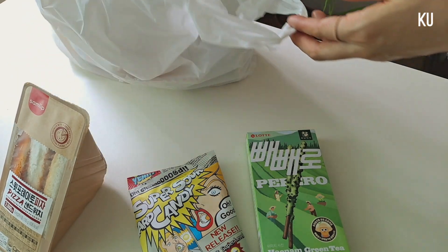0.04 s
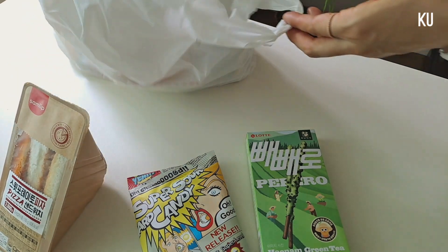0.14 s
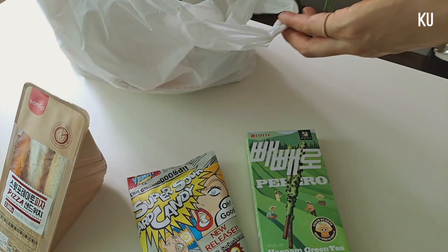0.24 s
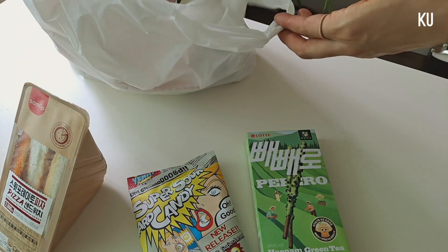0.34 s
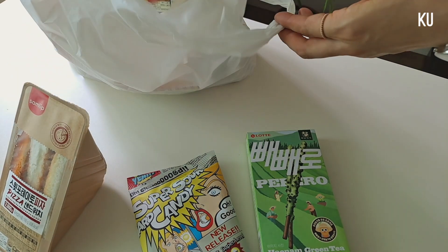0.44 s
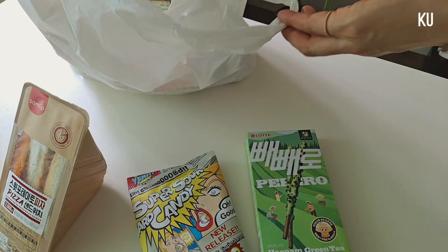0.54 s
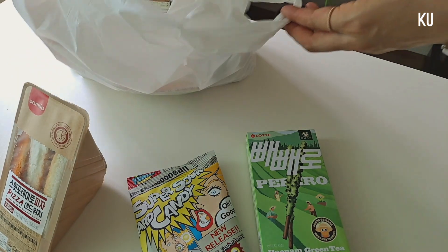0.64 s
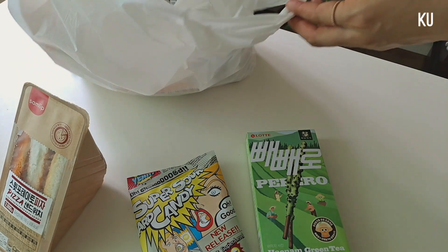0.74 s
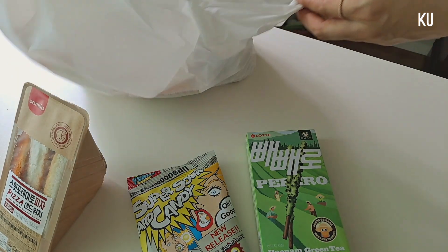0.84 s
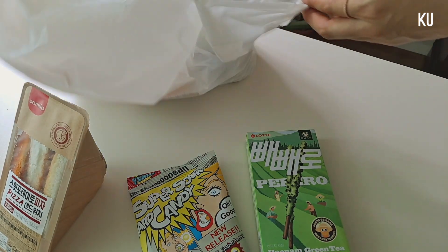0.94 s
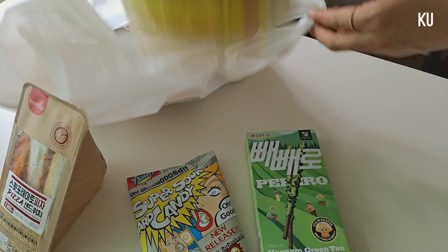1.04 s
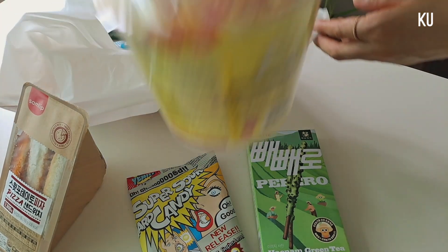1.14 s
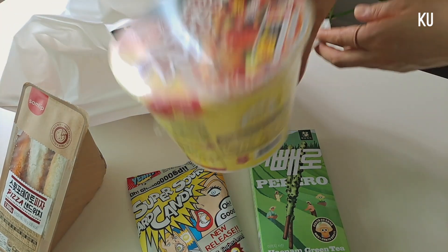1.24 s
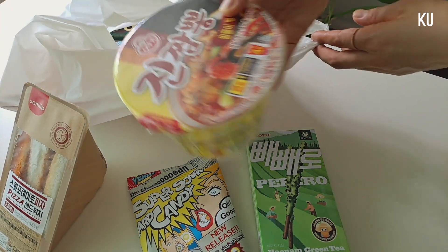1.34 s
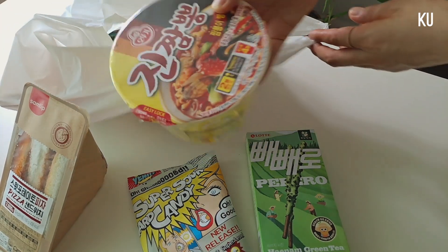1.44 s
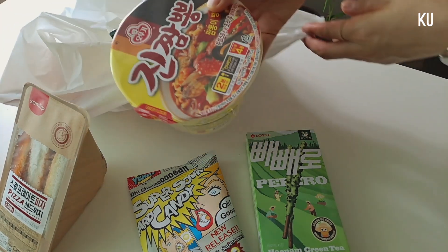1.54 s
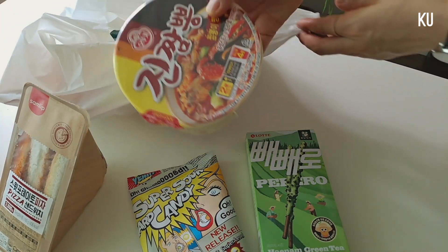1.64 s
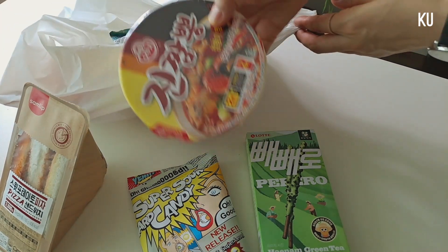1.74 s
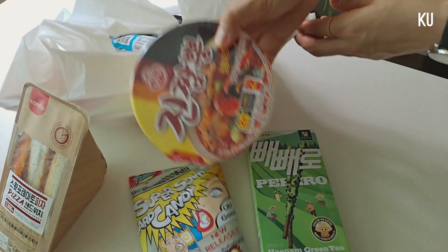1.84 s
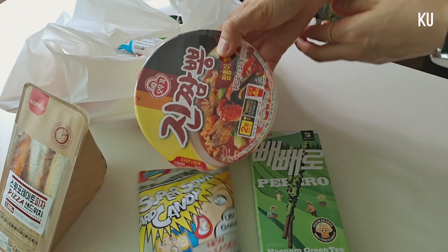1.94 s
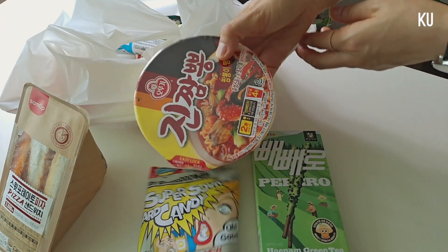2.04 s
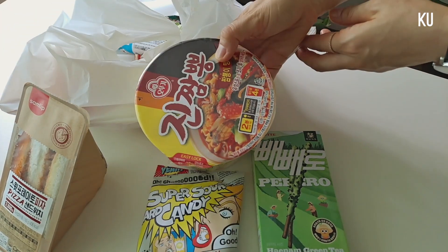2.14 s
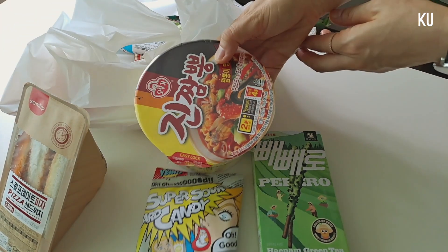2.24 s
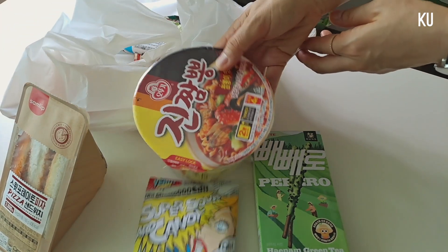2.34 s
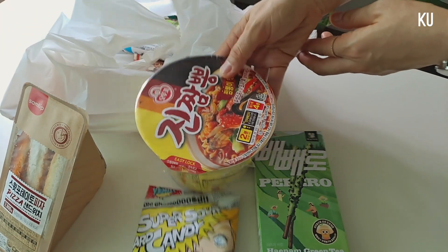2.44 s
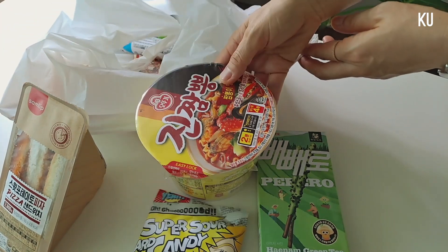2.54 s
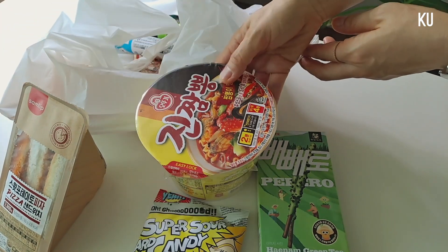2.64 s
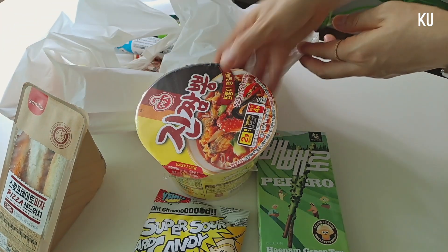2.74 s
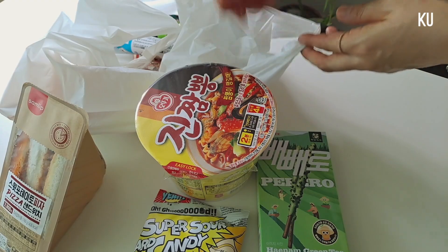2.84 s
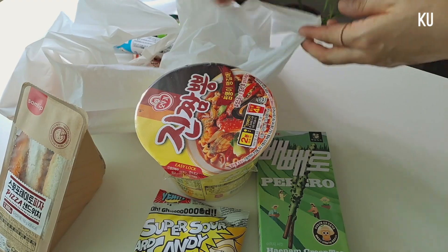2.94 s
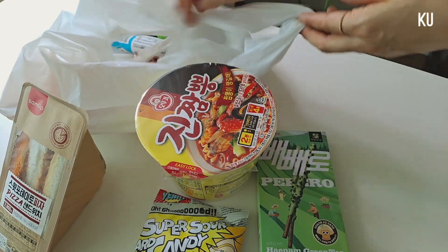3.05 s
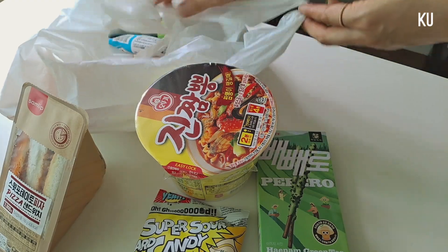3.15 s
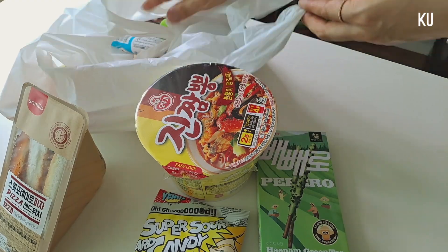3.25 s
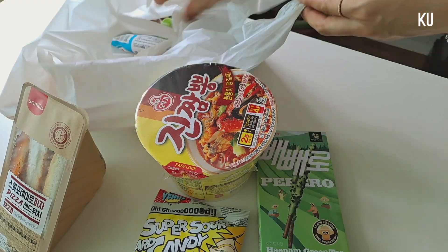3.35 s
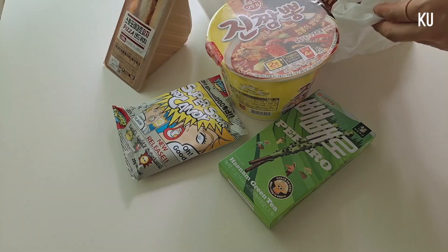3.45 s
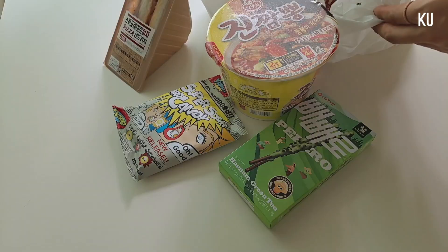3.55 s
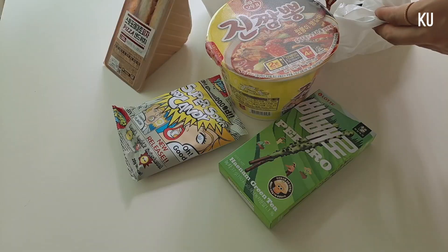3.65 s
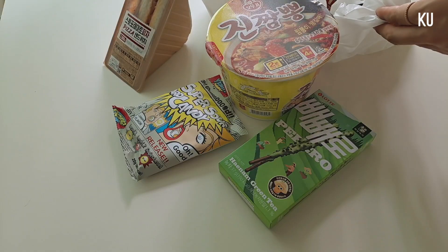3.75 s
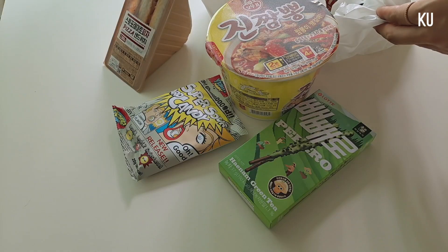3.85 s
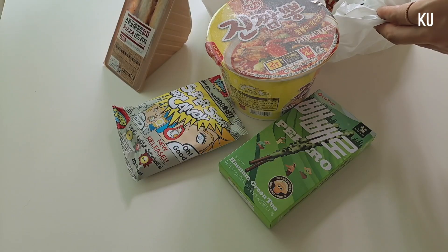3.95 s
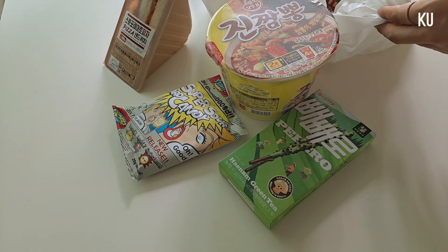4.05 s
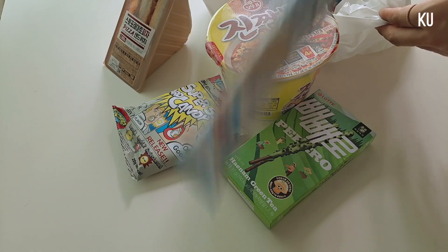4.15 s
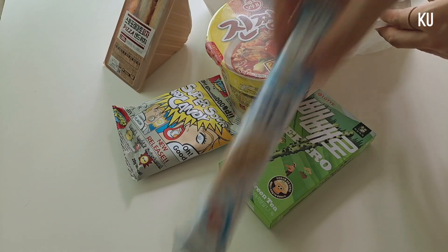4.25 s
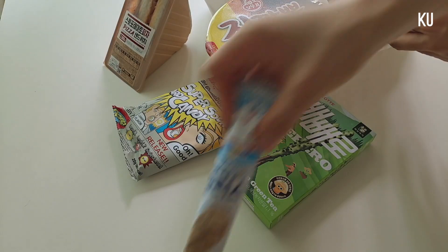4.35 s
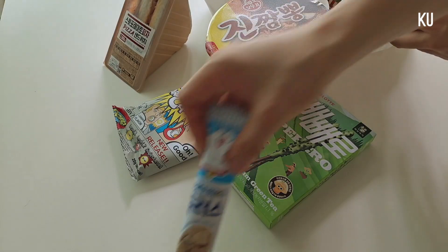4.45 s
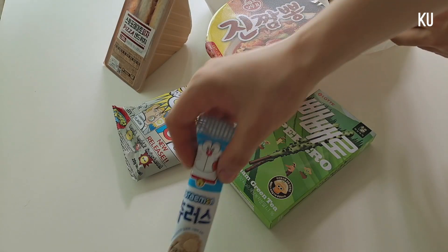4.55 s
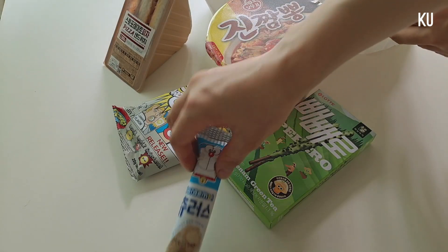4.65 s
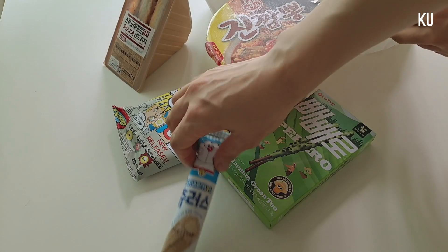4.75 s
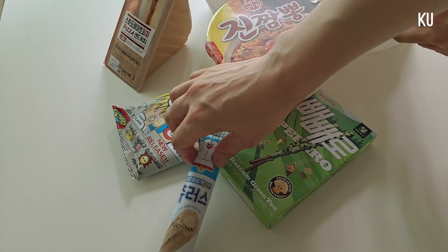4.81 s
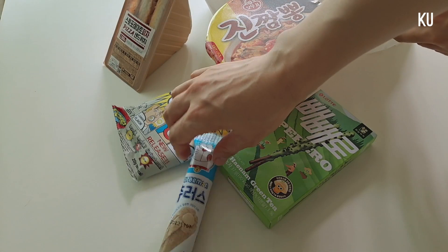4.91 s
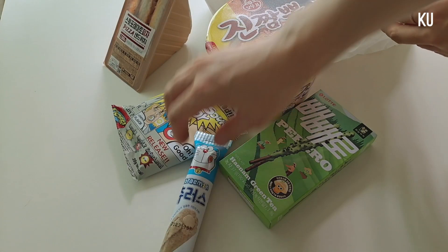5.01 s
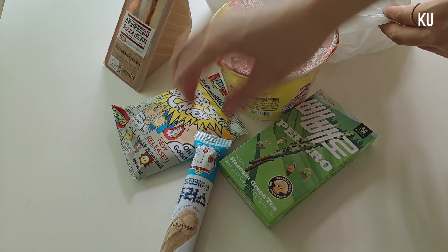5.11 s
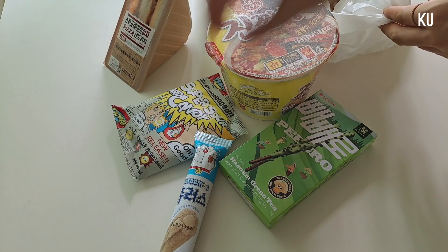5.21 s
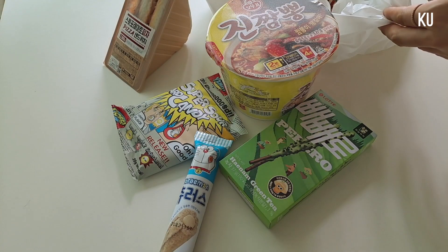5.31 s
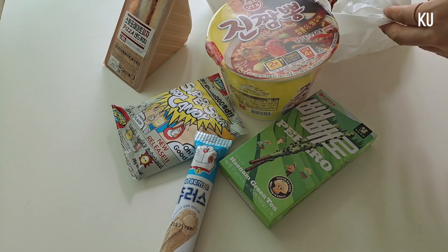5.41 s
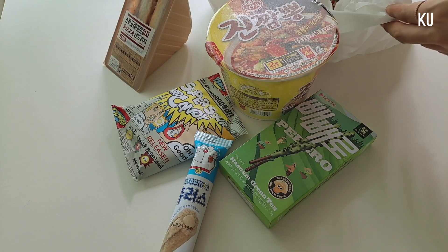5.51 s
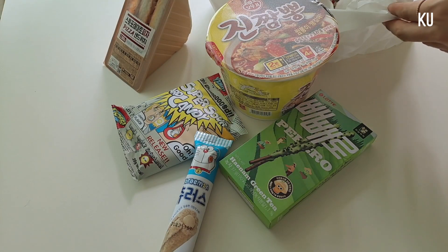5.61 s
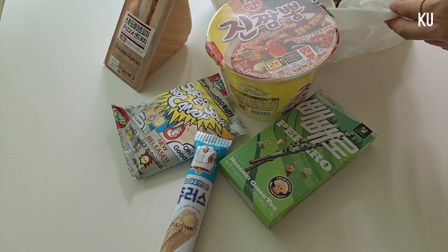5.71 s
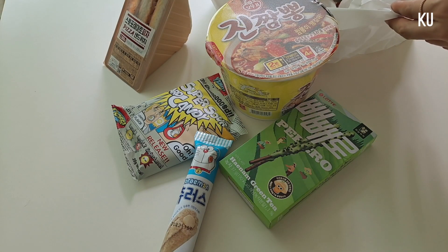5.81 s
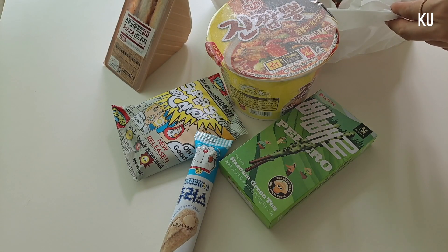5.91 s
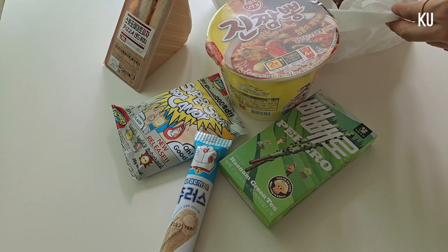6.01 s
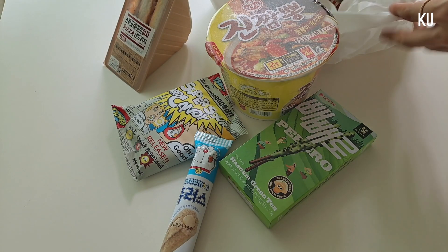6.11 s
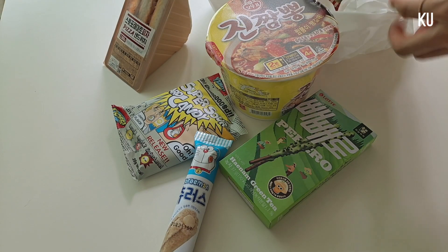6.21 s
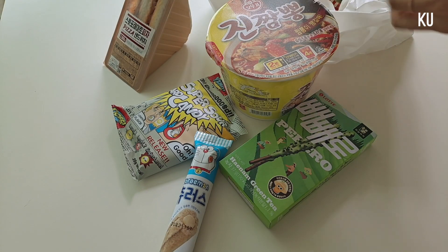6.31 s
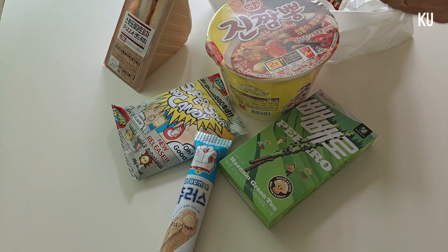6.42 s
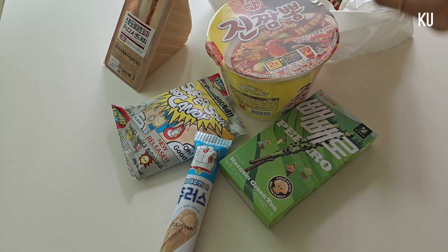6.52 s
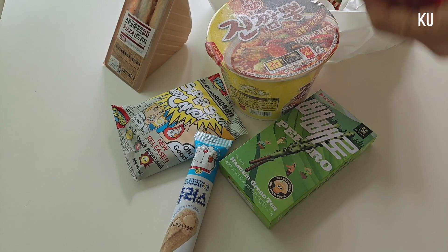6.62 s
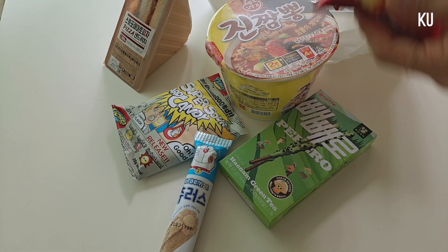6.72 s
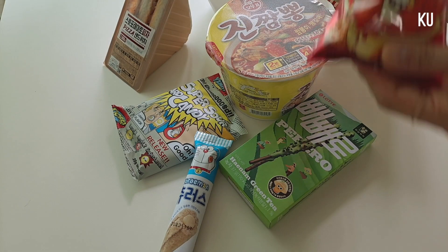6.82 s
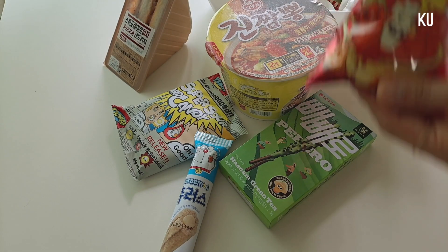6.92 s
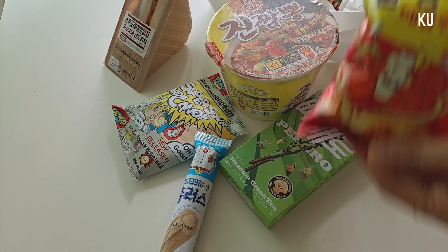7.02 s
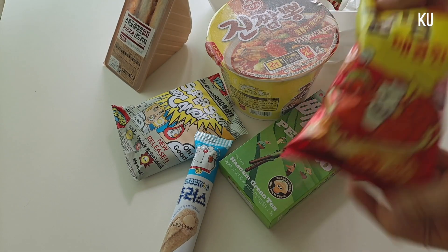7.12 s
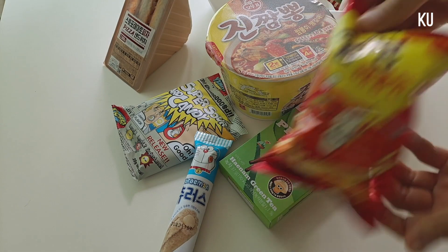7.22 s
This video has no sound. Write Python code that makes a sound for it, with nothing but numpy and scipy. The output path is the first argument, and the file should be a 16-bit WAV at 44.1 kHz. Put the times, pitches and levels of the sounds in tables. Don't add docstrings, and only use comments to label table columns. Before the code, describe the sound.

Someone rummages in a slack plastic bag at a table: soft rustle swelling with snaps and dull pops, then a hard hollow knock as a cup is set down. After a brief cut in the sound, crisp film crinkles and quiet pauses alternate, a sharp tick bursts out, and a stiff air-filled packet crunches and crackles to the end. Close stereo pickup, short indoor reverberation.

```python
import sys
import numpy as np
from scipy import signal
from scipy.fft import rfft, irfft, next_fast_len
from scipy.io import wavfile
from scipy.ndimage import uniform_filter1d

SR = 44100
rng = np.random.default_rng(int(sys.argv[2]) if len(sys.argv) > 2 else 0)


def dump_mix(stems):
    frames = np.atleast_2d(stems).T
    limited = np.clip(frames, -1, 1)
    pcm = np.round(limited * 32767).astype(np.int16)
    wavfile.write(sys.argv[1], SR, pcm)


def gain_from_db(level_db):
    decades = np.asarray(level_db, float) / 20
    return 10 ** decades


N = 320607

# f/Hz, density/dB
HUSH = [(18, -49), (30, -3.5), (134, -0.5), (374, -18.5), (449, -22), (526, -24.5), (1590, -20),
        (3220, -28), (16000, -37.5)]
HUSH_DB = -73
# f/Hz, t60/s
ROOM_DECAY = [(120, 0.45), (330, 0.45), (560, 0.51), (870, 0.43), (2300, 0.36), (6060, 0.43), (15000, 0.17)]
# f/Hz, likeness/1
ROOM_SAME = [(60, 0.4), (150, 1), (380, 0.73), (950, 0.26), (2400, 0.089)]
# f/Hz, level/dB
WALLS = [(200, 0.5), (1700, 2.5), (5000, -4), (14000, -5)]
# start t/s, end t/s
SILENCE = (3.437, 3.461)

# t/s, peak level/dB, bass share/dB, hollow f/Hz, rim crack share/dB
KNOCKS = [(0.081, -16.5, -40, 167, -28), (0.821, -30, -14, 148, -31), (0.885, -18, -18.5, 632, -18),
          (1.012, -13.5, -40, 600, -16), (1.552, -33, -30, 307, -17), (1.888, -12.5, -23, 202.5, -39),
          (2.339, -21.5, -24, 252, -17), (2.418, -23, -32, 534, -15), (2.461, -1, -40, 580, -11),
          (2.463, -7, -37, 471, -11.5), (2.79, -33, -40, 595, -28), (2.775, -27, -23, 473, -19.5),
          (3.282, -42, 6, 248, -11), (3.327, -49, -8, 152, -22), (3.717, -29.5, -41, 202, -30),
          (4.529, -52.5, -11, 150, -30), (4.801, -41.5, -11, 316, -18), (4.912, -34.5, -18, 162, 3),
          (4.959, -33.5, -25, 240, 0), (4.968, -32, -44, 453, -32), (5.516, -16, -28, 395, -27),
          (5.529, -17.5, -31, 288, -25), (6.0, -12.5, -48, 487, -33.5), (6.105, -22.5, -25, 256, -22),
          (6.2116, -12, -42, 512, -30), (6.595, -12.5, -40, 685, -3), (6.694, -12, -54, 687, -9),
          (6.963, -16.5, -25, 605, -14), (7.155, -10.5, -43, 616, -40)]
# f/Hz, level/dB, t60/s
TABLE_MODES = [
    (63, -8, 0.13),
    (95, -11, 0.052),
    (147, -4, 0.087),
]

# f/Hz, density/dB
LOOSE_FILM = [(180, -40), (300, -6.5), (617, -2), (793, -11), (1380, -10.5), (1580, -8.5), (3410, -14),
              (5100, -12.5), (9810, -19), (15000, -17.5), (16400, -21)]
# f/Hz, density/dB
TAUT_FILM = [(180, -6), (300, -0.5), (567, 4), (807, -2), (987, -0.5), (1930, -2.5), (7500, -12.5),
             (9650, -14.5), (14000, -12), (15700, -16), (16500, -19.5)]
TAUT_FROM_S, BRIGHT_FROM_S = 2.9, 2.6

# t/s, peak level/dB, fizz share/dB, left-right level/dB, panel f/Hz
SLACK_SNAPS = [(0.417, -19.5, -15, 2, 1966), (0.6584, -34, -20, 19, 5050), (0.7662, -16, -8.5, 5, 1694),
               (0.8844, -19, -26.5, 9.5, 1620), (1.0125, -13.5, -18, 8, 1660),
               (1.0875, -24.5, -8, 25, 3170), (1.2033, -19, -4, -10.5, 4130), (1.3159, -20, -0.5, 1, 5500),
               (1.353, -27, -3, 7, 5460), (1.6178, -27.5, -15, 5.5, 1090), (1.7729, -24, -16.5, 8, 880),
               (1.8881, -26, -22, 4, 1000), (2.0784, -25, -14.5, 4, 2200), (2.1761, -30.5, -1, 4, 1040),
               (2.1993, -33.5, -11, 9, 1740), (2.2758, -35, 5, 14, 1062), (2.3119, -32, -16.5, -5, 1024),
               (2.3419, -23.5, -19, 9.5, 2130), (2.4185, -27, -9, -1, 2010), (2.438, -22, -23, 6, 1276),
               (2.4601, -10, -36, 2, 1870), (2.7648, -37.5, -7, 3, 1170)]
TAUT_SNAPS = [(3.0644, -27, 9.5, 3, 1640), (3.3179, -22, 1.5, 7, 920), (3.464, -32, 4, 8, 1680),
              (3.4815, -20.5, 0.5, 7.5, 2350), (3.7229, -17.5, -7, 1.5, 920), (3.797, -19, -9, 3.5, 2300),
              (3.837, -29, -12, 9, 2100), (3.8637, -22, -3, 5.5, 1830), (3.9267, -29, -2, 7, 1930),
              (4.2019, -19.5, 0.5, 4, 2500), (4.469, -29.5, 11, 5, 1690), (4.511, -26.5, -1.5, 8, 1030),
              (4.53, -28.5, 2, 12, 2020), (4.672, -31.5, 1.5, 4, 1860), (4.867, -27, -9.5, 5.5, 1320),
              (4.9091, -27.5, -19, 3, 1710), (5.498, -17, -3, 1, 2950), (5.523, -10.5, -5, 2, 920),
              (5.6077, -15.5, -5, 3.5, 2940), (5.6973, -27, -9.5, 2, 2950), (5.8775, -27.5, -27, 3, 2200),
              (5.9599, -14.5, -6, 0, 1650), (5.9939, -16, -12, 0, 980), (6.036, -17, -12, 2, 940),
              (6.0913, -23.5, -6, 13.5, 842), (6.156, -29, 5, 1.2, 940), (6.172, -16.5, -5.5, 3, 1130),
                (6.2141, -18.5, -12, -1, 1090), (6.356, -9, 3, 2, 1210), (6.447, -18.5, -8, 1, 1010),
                (6.52, -22, -29, 4, 925), (6.554, -20, 4, 0, 1280), (6.576, -14.5, 1, 6, 1860),
                (6.5966, -12, -6, 11, 1570), (6.6503, -12.5, 1, 0, 1040), (6.6617, -15, -4, 9, 1640),
                (6.6963, -8.5, -7.5, 1, 900), (6.769, -14, 1, -1, 2820), (6.859, -12, 1.5, 1.5, 1260),
                (6.884, -9, -1, 0.3, 870), (6.9253, -15.5, -4, 1, 940), (6.9477, -13.5, -2, -5, 1280),
                (6.9948, -20, 4, -15, 1010), (7.0054, -8.5, -1.5, 2.5, 2800), (7.0444, -15.5, -8, -4, 2260),
                (7.078, -17, -8, -2, 925), (7.1168, -15, -1, 0, 3250), (7.154, -6.5, -22, 4.5, 1390)]
# t/s, peak level/dB
TICKS = [(0.289, -23), (0.6877, -23), (0.9552, -38), (1.1083, -25), (1.4214, -24), (3.168, -37),
         (3.632, -40), (3.8769, -17), (3.9706, -31.5), (4.5369, -22.5), (5.3768, -48), (5.5066, -16),
         (5.5304, -3), (5.549, -18), (5.89, -19), (5.9373, -25), (5.966, -14), (5.976, -16), (6.0004, -9.5),
         (6.5635, -10), (6.777, -5.5), (6.8782, -9), (6.9366, -22), (6.957, -6), (6.9661, -11),
         (7.1639, -6),
         (0.1813, -21), (0.4264, -26.5), (0.44, -25.5), (0.854, -18.5), (1.302, -34), (1.407, -21.5),
               (1.5095, -34), (1.539, -27), (2.0276, -31), (2.0475, -27.5), (2.3228, -35), (2.8115, -40),
               (3.2348, -21), (3.273, -22.5), (3.339, -31), (3.397, -36), (3.7148, -28), (4.4472, -55),
               (4.8475, -45), (5, -35.5), (5.398, -59), (5.408, -47), (5.4916, -29.5), (5.518, -14),
               (5.63, -24), (5.99, -10), (6.044, -15), (6.181, -22), (6.867, -25), (6.941, -13),
               (6.9524, -15), (6.9639, -3), (7.0719, -13.5), (7.1468, -12), (7.1603, -14), (7.1737, -9),
               (7.1958, -15)]
# t/s, peak level/dB, panel f/Hz
POPS = [(0.887, -13.5, 1560), (0.902, -22, 634), (0.9524, -17, 1620), (1.0493, -19, 1660),
        (1.177, -21.5, 1500), (1.8436, -32, 900), (2.4648, -19, 1700), (2.474, -17, 1900),
        (2.487, -19, 1500), (2.5, -23, 2000), (2.963, -44, 1210), (3.3, -30, 835), (3.3252, -31.5, 890),
        (3.3386, -28, 1300), (3.426, -41, 1200), (3.6342, -38.5, 1500), (3.732, -28.5, 1090),
        (0.992, -19.5, 1700), (0.996, -19.5, 600), (1.052, -19.5, 600), (0.955, -24, 620),
        (1.026, -14.5, 1770), (1.1833, -25, 2040), (3.898, -35, 1900), (3.953, -31.5, 1770),
        (4.054, -49, 1800), (4.5042, -37, 1210), (4.5397, -30.5, 2030), (4.624, -39.5, 1500),
        (4.803, -39, 1500), (4.916, -26, 1740), (4.9236, -25.5, 1700), (4.933, -30.5, 1500),
        (4.868, -34, 1390), (5.0118, -43, 1200), (5.823, -36, 1200), (5.858, -35.5, 1200),
        (6.1552, -37, 1100), (6.4626, -26, 1070), (6.4687, -24, 1070), (6.5644, -20.5, 1290),
        (6.733, -18, 1210), (6.892, -19.5, 1500), (6.935, -19, 1190), (6.943, -17, 1190),
        (6.9669, -20, 1300), (7.1146, -23, 1090), (7.146, -15, 1300)]
# t/s, peak level/dB, ring f/Hz
PINGS = [(2.9063, -59, 15000), (2.9257, -55, 11250), (2.9572, -39, 12600), (2.9777, -43, 13000),
         (3.0158, -23.5, 12500), (3.1, -25, 5400), (3.2106, -37, 14500), (3.253, -23, 11900),
         (3.877, -27, 13500), (4.675, -32, 4970), (5.4805, -51, 13600), (5.486, -42, 12000),
         (5.499, -16.5, 12800), (5.668, -44, 13000), (6.117, -44, 13000), (6.282, -50, 13100),
         (6.552, -21.5, 13000), (6.86, -9, 7400), (6.8594, -9.5, 14300), (7.0049, -11, 11200),
         (6.9531, -18, 11000), (7.0718, -21, 12000), (7.109, -22, 7000), (7.154, -20, 11800)]
PING_DB, POP_DB, PANEL_DB = 16, 13, 6
CREASE_S, CREASE_SPREAD_S = 0.00045, 0.0009
SLACK_BODY_DB, TAUT_BODY_DB = -2.5, -4.5
LARGE_PANEL_HZ, BODY_DB_PER_OCTAVE = 2300, -28.5
STIFF_PANEL_HZ, STIFF_DB_PER_OCTAVE = 1500, -5.5

# peak t/s, level/dB, 20 dB rise t/s, 20 dB fall t/s, hollowness/dB
SLACK_MOVES = [(0.47, -44, 0.84, 0.46, -6), (0.831, -39.5, 0.32, .5, -9), (0.961, -37, 0.18, 0.33, 0),
               (1.0, -40, 0.06, -0.054, 10), (1.054, -49.5, 0.08, 0.03, 13.5),
               (1.06, -30, 0.33, 0.29, -8.5), (1.108, -32.5, 0.08, 0.02, -11.5), (0.9, -41, 0.08, -0.02, 8),
               (1.3, -46.5, -4, 0.6, -5), (1.577, -52.5, 0.19, 0.02, 9.5), (1.799, -48.5, -0.13, 0.17, 4.5),
               (1.95, -47, 0.41, 0.26, 5.5), (2.35, -47, 0.14, -0.15, -1.5),
               (2.481, -41.5, 0.27, 0.0658, 7.5), (2.597, -62, -0.64, 0.13, 20.5), (2.7, -60, 0.2, 0, 2)]
TAUT_MOVES = [(2.991, -49, 0.12, 0.43, -4.5), (3.06, -42.5, 0.0643, 0.04, -5),
              (3.14, -47, 0.15, 0.29, -3.5), (3.324, -61, -0.1, 0.06, -5), (3.427, -49, 0.54, 0.03, -4.5),
              (3.9, -57, -0.5, 0.23, -8), (4.03, -63, -0.1, 0.03, -2.5), (4.25, -64.5, -0.1, 0.2, -8),
              (4.535, -50, 0.04, 0.03, -12), (4.545, -59.5, 0.12, 0.47, 1),
              (4.917, -47.5, 0.04, 0.0347, 8.5), (5.529, -39.5, 0.0335, 0.17, 3),
              (5.661, -53.5, 0.11, 0, 6.5), (5.82, -71, 0.43, -8, -7), (5.93, -49, 0.1366, 0.22, 9),
              (6.067, -61, 0.15, 0.3, 2), (6.21, -48.5, 0.17, 0.1, -3), (6.53, -42.5, 0.0542, 0.87, 3),
              (6.885, -37.5, 0.02, 0.01, 9.5), (6.959, -38.5, 0.06, -0.2, 4),
              (7.041, -39, 0.18, 0.18, -0.5), (7.154, -36, 0.0343, -0.43, 3)]
# t/s, level/dB, 20 dB fall t/s, hollowness/dB
SLIPS = [(0.0, -43.5, 0.02, 9.5), (0.079, -42.5, 0.35, 4), (2.76, -53, -0.02, 6), (3.462, -53.5, 0.34, -2),
         (3.715, -46.5, 0.22, 1.5), (4.469, -50.5, 0.2155, -5.5), (4.8, -66.5, 0.12, 8),
         (5.378, -74.5, 0.25, -4.5), (5.481, -69, 0.5, 22), (5.497, -39.5, 0.14, 5), (5.82, -61, 0, 1),
         (5.852, -61, 0.3, 0), (5.876, -57, -0.1, 6), (5.958, -38.5, 0.18, 6), (6.359, -47.5, 0.1, -9),
         (6.448, -43.5, 0.15, 2), (6.598, -42, 0.06, 7), (6.7, -44, 0.2, 6), (6.86, -49.5, 0.3, -13),
         (7.194, -51, 0, -7)]
SLIP_RISE_S = 0.003
SLACK_FIZZ_DB, TAUT_FIZZ_DB = -9, -2
FIZZ_LOSS, RUMBLE_DB, RUMBLE_SHARE = 0.17, -8.5, 1
LOOSE_CRISP, TAUT_CRISP = 0.099, 0.33
CENTRES_HZ = [3700, 10000, 1000, 200]
# f/Hz, density/dB
RUMBLE = [(25, -32.5), (55, -14.5), (130, -4), (250, 3), (1000, -0.5)]
# t/s, ring f/Hz
POCKET = [
    (0.78, 5400),
    (0.86, 5500),
    (0.93, 4630),
    (1.02, 5140),
    (1.08, 4300),
    (1.19, 4130),
    (1.33, 5660),
    (1.4, 5630),
]
POCKET_DB, POCKET_WIDTH_HZ = -11, 800


def evened(x):
    return x / np.sqrt(np.mean(x ** 2) + 1e-20)


def read(points, hz):
    f, value = np.transpose(points)
    return np.interp(np.log(hz + 1), np.log(f + 1), value)


def band(x, k):
    length = next_fast_len(N)
    hz = np.fft.rfftfreq(length, 1 / SR)
    share = read(sorted((f, f == CENTRES_HZ[k]) for f in CENTRES_HZ), hz)
    return irfft(rfft(x, length) * share, length)[..., :N]


def coloured(x, *spectra):
    hz = abs(np.fft.fftfreq(2048, 1 / SR))
    level_db = sum(read(points, hz) for points in spectra)
    log_gain = np.log(gain_from_db(np.maximum(level_db, -80)))
    response = np.exp(np.conj(signal.hilbert(log_gain)))
    taps = np.fft.ifft(response).real[:1024]
    return signal.oaconvolve(np.atleast_2d(x), taps[None], axes=1)[:, :np.shape(x)[-1]]


def resonate(x, hz, width_hz):
    turn = np.exp(2j * np.pi * np.cumsum(hz) / SR)
    r = np.exp(-np.pi * width_hz / SR)
    smooth = signal.lfilter([(1 - r) ** 2], [1, -2 * r, r ** 2], x / turn + 1e-18)
    return 2 * (turn * smooth).real


def add(mix, s, sound, pan_db, lag):
    for side, sign in enumerate((1, -1)):
        start = max(round(s * SR + sign * lag / 2), 0)
        part = mix[side, start:][:len(sound)]
        part += gain_from_db(sign * pan_db / 2) * sound[:len(part)]


def pair_noise(frames, hz):
    a, b, c, d = rng.standard_normal((frames, len(hz), 4)).T
    same = np.clip(read(ROOM_SAME, hz), 0, 1)[:, None]
    left = a + 1j * b
    right = same * left + np.sqrt(1 - same ** 2) * (c + 1j * d)
    return np.array([left, right])


def hush():
    hz = np.fft.rfftfreq(2048, 1 / SR)
    z = pair_noise(N // 512 + 5, hz) * gain_from_db(read(HUSH, hz))[:, None]
    noise = signal.istft(z, nperseg=2048, noverlap=1536)[1][:, :N]
    return gain_from_db(HUSH_DB) * evened(noise)


def room(x):
    hz, t = np.fft.rfftfreq(256, 1 / SR), np.arange(500) * 64 / SR
    turn = np.arange(N) / SR * 2.258
    out = np.zeros((2, N))
    for k in range(3):
        z = pair_noise(len(t), hz) * gain_from_db(-60 * t / read(ROOM_DECAY, hz)[:, None])
        tail = signal.istft(z, nperseg=256, noverlap=192)[1]
        tail *= 1 - np.exp(-np.arange(tail.shape[1]) / (0.004 * SR))
        tail /= np.linalg.norm(tail[0])
        share = np.sqrt(2 / 3) * np.cos(turn + k * np.pi / 3)
        out += signal.fftconvolve((x * share)[None], tail, axes=1)[:, :N]
    return out * gain_from_db([[1.7], [-1.7]])


def knocks():
    out, t = np.zeros((2, N)), np.arange(SR // 4) / SR
    variations = rng.uniform(0.819, 1.113, (len(KNOCKS), 6))
    for (s, db, bass_db, hz, rim_db), u in zip(KNOCKS, variations):
        rim = np.sin(2 * np.pi * 1750 * u[5] * t) * gain_from_db(rim_db - 60 * t / 0.014)
        partials = [(1, 1), (0.47 * u[3], 0.4), (0.871 * u[4], 0.7), (1.176 * u[5], 0.6),
                    (1.462 * u[0], 0.45), (2.064 * u[3], 0.4), (2.7 * u[1], 0.3)]
        hollow = sum(share * np.sin(2 * np.pi * ratio * hz * t) for ratio, share in partials)
        hollow *= 1 - np.exp(-t * (hz + 300) / 2.7)
        hollow *= gain_from_db(-60 * t * (hz + 300) / 21)
        top = sum(gain_from_db(level - 60 * t / t60) * np.sin(2 * np.pi * f * v * t)
                  for (f, level, t60), v in zip(TABLE_MODES, u))
        top *= (1 - np.exp(-t / 0.003)) ** 2
        blow = gain_from_db(db) * (rim + 0.86 * hollow + 2.3 * gain_from_db(bass_db) * top)
        add(out, s, blow, 5.2 + 8.0 * (u[2] - 1), -9 + 50 * (u[1] - 1))
    return out


def crease_edge(z, u, length, t):
    run = (t >= 0) * (np.exp(-t / (0.7 * length)) + 0.14 * np.exp(-t / 0.005))
    others = sum(0.13 * size ** 2 * np.exp(-((t - 0.002 - 0.018 * at) / 0.0006) ** 2)
                 for at, size in u[2:].reshape(-1, 2))
    edge = rfft(z * (run + others))
    return irfft(edge / np.sqrt(uniform_filter1d(abs(edge) ** 2, size=25)))


def snaps():
    out, around = np.zeros((2, N)), np.zeros((2, N))
    t = np.arange(1200) / SR - 0.008
    rows = SLACK_SNAPS + TAUT_SNAPS
    rows = rows + [(s, db - 6.0, 1.5, 3.5, 6000) for s, db in TICKS]
    rows += [(s, db, -22, 3.0, hz) for s, db, hz in POPS]
    rows += [(s, db - 2.5, 0, 3.0, -hz) for s, db, hz in PINGS]
    noise, draws = rng.standard_normal((len(rows), 1200)), rng.random((len(rows), 10))
    for (s, db, fizz_db, pan_db, hz), z, u in zip(rows, noise, draws):
        slack = s < TAUT_FROM_S
        if hz < 0:
            ring_db, hz = PING_DB, -hz
        else:
            ring_db = POP_DB if fizz_db == -22 else PANEL_DB
        large_hz = LARGE_PANEL_HZ if slack else STIFF_PANEL_HZ
        small = max(np.log2(hz / large_hz), 0) if hz < 6000 else 0
        if slack:
            body_db = SLACK_BODY_DB + BODY_DB_PER_OCTAVE * small
        else:
            body_db = TAUT_BODY_DB + STIFF_DB_PER_OCTAVE * small
        length = (CREASE_S + CREASE_SPREAD_S * u[0]) * (4 if slack else 1)
        burst = crease_edge(z, u, length, t)
        click = np.linalg.norm(burst) * (np.arange(1200) == 350)
        tilt = [(250, body_db - 20.5), (1000, body_db), (3700, 0.56 * min(fizz_db + 14, 0)),
                (10000, fizz_db + 4.0)]
        panel = [(hz / 1.27, 0), (hz, ring_db), (hz * 1.36, 0)]
        burst, click = coloured([burst, click], LOOSE_FILM if slack else TAUT_FILM, tilt, panel)
        gain = gain_from_db(db - 4.0) / np.sqrt(uniform_filter1d(burst ** 2, size=44).max())
        add(out, s + t[0] + 0.00064, gain * burst, pan_db, 22 * (u[1] - 0.5))
        add(around, s + t[0], gain * click, 0, 0)
    return out, around[0]


def handling(t):
    slips = [(s, db, SLIP_RISE_S, fall, hollow_db) for s, db, fall, hollow_db in SLIPS]
    moves = SLACK_MOVES + TAUT_MOVES + slips
    peak, db, rise, fall, hollow_db = np.transpose(moves)[:, :, None]
    before = (peak - t) / np.maximum(rise, 1 / 500)
    after = (t - peak) / np.maximum(fall, 1 / 100)
    away = np.maximum(before, after)
    move_db = db - 20 * np.minimum(np.maximum(away, away ** 2), 10)
    fizz_db = np.where(peak < BRIGHT_FROM_S, SLACK_FIZZ_DB, TAUT_FIZZ_DB) - FIZZ_LOSS * hollow_db
    shifts_db = (0, fizz_db, hollow_db, RUMBLE_DB + RUMBLE_SHARE * hollow_db)
    return [np.sqrt((gain_from_db(move_db + shift) ** 2).sum(0)) for shift in shifts_db]


def swarm(per_s, spread_db, clump_db, ms, count=9):
    clumps = evened(uniform_filter1d(rng.standard_normal(N // 64 + 1), 9)).repeat(64)[:N]
    size_db = spread_db * np.minimum(rng.exponential(1, N), 4) + clump_db * np.clip(clumps, -2, 2)
    clicks = gain_from_db(size_db) * rng.choice([-1., 1.], N) * (rng.random(N) < per_s / SR)
    place = rng.integers(0, count, N)
    out, t = np.zeros((2, N)), np.arange(128) / SR
    for k in range(count):
        crack = rng.standard_normal(128) * np.exp(-t * 1000 / ms)
        sound = signal.oaconvolve(clicks * (place == k), crack / np.linalg.norm(crack))
        add(out, 0.001, sound, rng.uniform(3.2, 7.0), rng.uniform(-11.0, 14))
    return evened(out), evened(clicks)


def air_pocket(clicks, t):
    ring = resonate(clicks, np.interp(t, *np.transpose(POCKET)), POCKET_WIDTH_HZ)
    return evened(ring) * (t > POCKET[0][0]) * (t < POCKET[-1][0])


def rustle():
    t = np.arange(N) / SR
    levels = handling(t[::32])
    taut = t >= TAUT_FROM_S
    crisp = np.where(taut, TAUT_CRISP, LOOSE_CRISP)
    slither = np.vstack(swarm(15000, 2.35, 2.0, 0.061))
    crackle = np.vstack(swarm(700, 2.8, 4.5, 0.5))
    clicks = np.sqrt(1 - crisp) * slither + np.sqrt(crisp) * crackle
    film = np.where(taut, evened(coloured(clicks, TAUT_FILM)), evened(coloured(clicks, LOOSE_FILM)))
    sources = (film, film, film, coloured(clicks, RUMBLE))
    trims_db = (0.0, 8.0, -3.5, -0.5)
    out = np.zeros((3, N))
    for k, (x, level, trim_db) in enumerate(zip(sources, levels, trims_db)):
        gain = np.interp(t, np.linspace(0, t[-1], len(level)), level)
        out += gain * gain_from_db(trim_db) * evened(band(x, k))
    out += gain_from_db(POCKET_DB) * np.interp(t, t[::32], levels[0]) * air_pocket(clicks, t)
    return out[:2], out[2]


def scene():
    near_rustle, rustle_round = rustle()
    near_snaps, snaps_round = snaps()
    near_knocks = knocks()
    film_round = gain_from_db(-4) * rustle_round + gain_from_db(-8.5) * snaps_round
    send = film_round + gain_from_db(-6.0) * near_knocks.mean(0)
    reverberation = room(coloured(send, WALLS)[0])
    return near_rustle + near_snaps + near_knocks + reverberation + hush()


def band_limit(x):
    return signal.sosfilt(signal.butter(12, 16960, fs=SR, output="sos"), x)


def record(dry):
    t = np.arange(N) / SR
    start, end = SILENCE
    gap = np.clip(np.minimum(t - start, end - t) / 0.0012, 0, 1)
    gap_db = -38 * gap - 44 * gap * (t > end - 0.009)
    bass_cut = signal.butter(4, 55, "highpass", fs=SR, output="sos")
    top_cut = signal.firwin(511, 15880, window=("kaiser", 4), fs=SR)
    heard = signal.sosfilt(bass_cut, dry)
    heard = signal.oaconvolve(heard, top_cut[None], "same")
    return band_limit(heard * gain_from_db(gap_db))


dry = scene()
out = record(dry)
dump_mix(out)
```